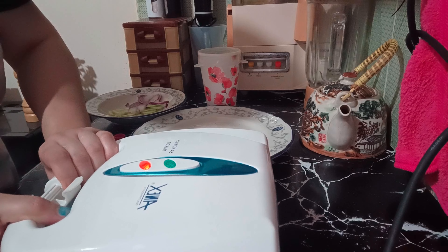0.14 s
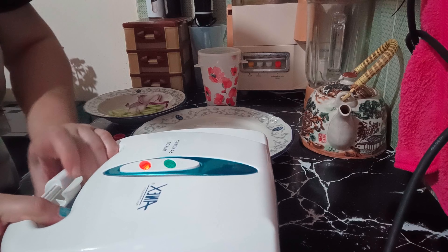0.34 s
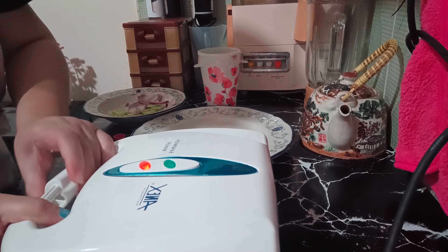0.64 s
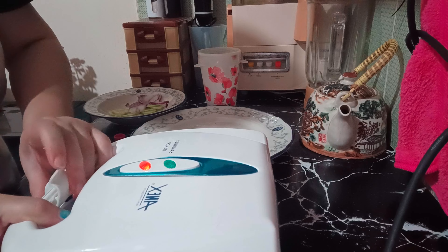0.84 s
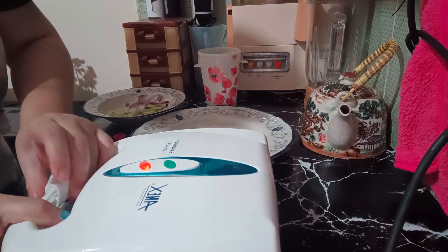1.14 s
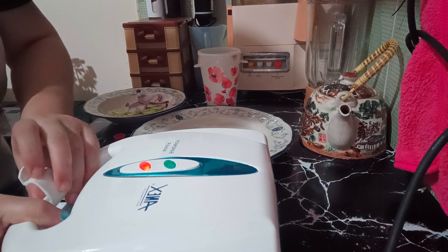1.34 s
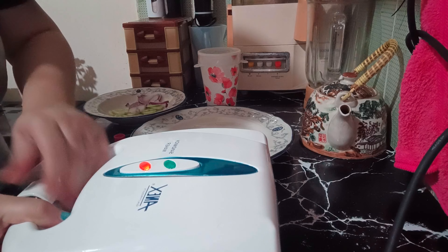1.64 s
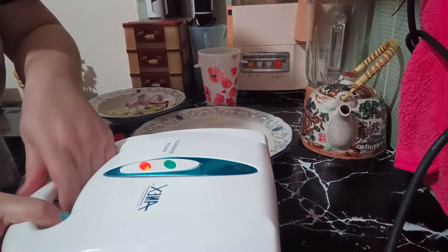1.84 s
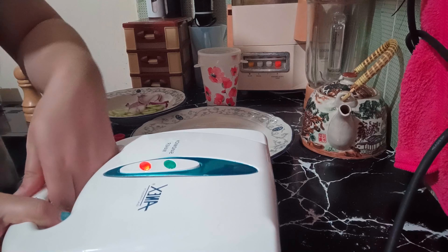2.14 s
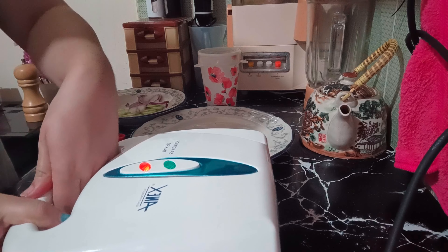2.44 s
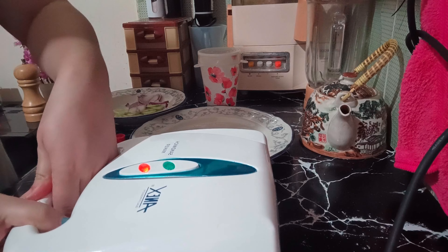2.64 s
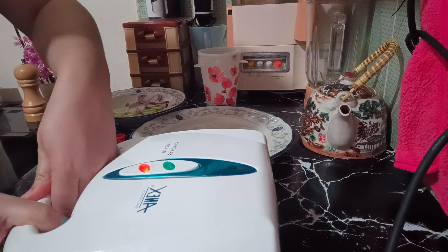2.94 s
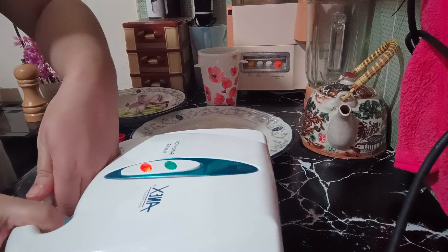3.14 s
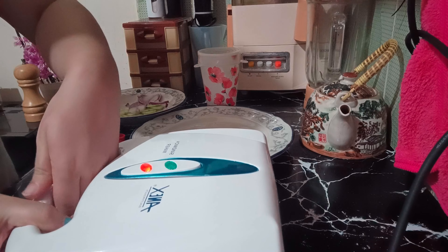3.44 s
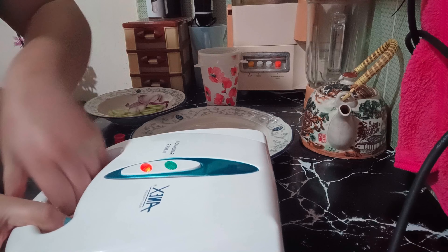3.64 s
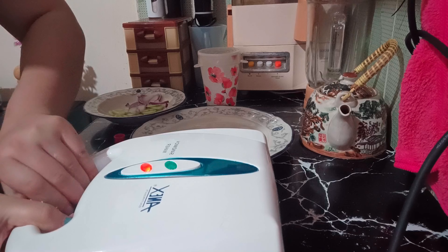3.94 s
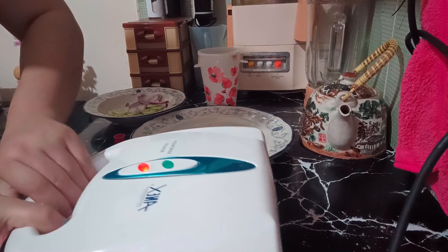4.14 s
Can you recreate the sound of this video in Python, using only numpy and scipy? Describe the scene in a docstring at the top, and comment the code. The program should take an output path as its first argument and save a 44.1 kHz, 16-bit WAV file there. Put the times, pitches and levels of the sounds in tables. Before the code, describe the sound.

In a small kitchen, close to the microphone, hands work the plastic lid and latch of a sandwich maker over a barely audible low hum and thin hiss. A quick run of knocks comes at about 0.3 s, strongest at 0.35, then faint touches and a dull knock at 1.05. Light clacks around 1.2-1.4 s include a short, soft scrape. At 1.82 s a very loud, hard plastic snap cracks out with a brief thin metallic ring and a short room tail. A second, lesser snap follows at 2.22, then small fumbling knocks and soft bumps around 2.45-2.65 and tiny ticks. Another crisp click-clack lands at 3.15. It is mostly quiet until a muted knock at 3.9 and a little flurry of clicks at 4.15-4.2. At about 4.26 s a heavy, deep thud of the body booms with a plastic clatter, just as the sound ends.

```python
"""Small kitchen, stone counter: hands work the plastic latch of a sandwich maker; the lid thuds at the end.
Most contacts are short gritty clatters, one is a slow scrape; all ring the modes of the plastic shell.
Hard clicks also wake thin metal plates; one-way pushes ring the low modes of the body.
Decaying noise gives the room's quarter-second tail; noise bands form a low appliance drone and faint hiss."""
import sys
import numpy as np
from scipy import signal
from scipy.io import wavfile

SR = 44100
rng = np.random.default_rng(int(sys.argv[2]) if len(sys.argv) > 2 else 0)


def magnitude_from_level(level_db):
    """Linear magnitude for a level in decibels (20 dB per decade)."""
    exponent = np.asarray(level_db, float) / 20
    return 10 ** exponent


def dump_mix(stems):
    """Bounce the given channels to the path in sys.argv[1] as a 16-bit WAV at rate SR."""
    frames = np.atleast_2d(stems).T  # one column per channel
    limited = np.clip(frames, -1, 1)  # hard clip at full scale
    pcm = np.round(limited * 32767).astype(np.int16)
    wavfile.write(sys.argv[1], SR, pcm)


N = 188790

# low noise and drone together: (time [s], rms level [dB])
DRONE_CURVE = [(0, -62), (.3, -68), (1.8, -68), (3.2, -67), (3.45, -72), (3.6, -70.5), (4.05, -69.5),
               (4.28, -61.5)]
# drone tones against the broad low noise at -68 dB: (centre [Hz], width [Hz], rms level [dB])
DRONE_TONES = [(122, 70, -74.5), (199.5, 4.1, -70), (347, 20, -77.5)]
# relative noise density, low and high parts levelled later: (frequency [Hz], density [dB])
NOISE_SPECTRUM = [(18, -49), (30, -19), (199, -2), (245, -8.5), (328, -6), (526, -11), (600, -10),
                  (760, -17), (962, -18.5), (1130, -19), (2290, -27.5), (3670, -28.5), (5740, -37.5),
                  (12000, -38), (16000, -31)]
# left-right correlation of the noise: (frequency [Hz], correlation [-1..1])
NOISE_LIKENESS = [(30, 0.027), (70, 0.75), (160, 0.67), (300, 0.24), (700, 0), (3000, 0), (15000, 1)]
HISS_RMS_DB = -75.5

# room decay at its start: (frequency [Hz], time to fall 60 dB at that rate [s])
ROOM_DECAY = [(300, .3), (800, 0.32), (2100, 0.35), (5500, 0.39), (14600, 0.22)]
# room tail: (frequency [Hz], gain of the noise [dB])
ROOM_GAIN = [(150, -37.5), (550, -33.5), (1100, -37.5), (2000, -41), (4000, -42), (8000, -33.5),
             (11000, -34.5), (14000, -34.5)]

# weight shifts of the body on the counter: (time [s], push area [dB], four times the rise scale [ms])
BODY_PUSHES = [(1.658, -48, 3), (1.675, -43.5, 4), (1.835, -44.5, 4), (2.575, -41.5, 3.2),
               (2.605, -41.5, 4), (2.64, -54.5, 1.3), (4.2575, -14, 1.5), (4.267, -11, 2), (4.2725, -16, 2)]
# whole body rocking on its feet: (frequency [Hz], gain [dB], t60 [s])
BODY_MODES = [(135, -9, 0.05), (162, -7, 0.066), (209, -0.5, .15), (398, 2, 0.14), (510, 0.5, 0.092)]

# metal plates inside: (frequency [Hz], mean ring height against the click in that range [dB], t60 [s])
PLATE_MODES = [(2620, -31, .3), (3550, -25, .22), (4550, -26, .27), (5670, -29, .27), (7535, -19, .27)]
SNAP_DB = -35   # only louder clicks wake the plates

# edges of the contact bands hollow, knock, click, tick, air: (frequency [Hz])
CONTACT_EDGES_HZ = [430, 900, 2500, 6000, 9500, 16000]
# plastic shell: (frequency [Hz], mean strength before the lean [dB], t60 [s])
SHELL_MODES = [(546.6, -3.5, 0.21), (585, -1.5, 0.14), (648, -4.5, 0.098), (797, -10, .03),
               (958.6, -11, 0.048), (1108, -3, 0.044), (1181, 3, 0.022), (1340, -2.5, 0.028),
               (1562, -1.5, 0.028), (1640, -9, 0.0067), (1819.5, -1, .02), (1975, 3.5, .02),
               (2074, -3.5, 0.0064), (2950, 6.5, .01), (3430, 9.5, 0.0052), (3790, 2, .01),
               (4115, 3.5, 0.012), (4250, -1, .01), (4700, 1, .01), (5360, -6.5, 0.03), (6200, 11.5, .01),
               (8230, 0, 0.009), (8090, -2.5, 0.013), (9044, -5.5, 0.0024), (10660, -3, 0.0032),
               (12170, -6, .006)]
# per band: (bare crack against ringing modes [dB])
BAND_CRACK_DB = [-12, -10, -5, -2, 5]
# per band, low modes build up more slowly: (share of the clatter length [ratio])
BAND_STRETCH = [1.6, 1.5, .95, 0.55, .8]
# per band: (upper edge of the sound over the band's edge [ratio])
BAND_TOP_RATIO = [.82, 0.87, 0.92, 0.93, 0.91]
# latch clicks, faint ticks and one slow scrape (at 1.345 s), 10 ms energy:
# (time [s], click [dB], knock re click [dB], tick re click [dB], length [ms])
LATCH_EVENTS = [(0.958, -55.5, 0, -12.5, 13), (1.224, -44, 11, -4.5, 5.8), (1.345, -63, 13.5, 8, 95),
                (1.646, -66.5, 4, -2.7, 19.5), (1.753, -62.5, 0.5, -4, 3), (1.792, -56, 6.5, -2.5, 9.6),
                (1.8224, -14, -12, -9, 2), (1.826, -18.5, -2, 0, 5.9), (2.2238, -25.5, -5, -11.5, 3.5),
                (2.409, -71.5, -12.5, 1, 2.4), (2.575, -64, 5, -4.5, 1.83), (2.689, -69, -1, -16, 2.4),
                (2.77, -72.5, -18, -1.5, 0.92), (2.909, -75.5, -18.5, 1, 1.5), (2.93, -81, -8.5, 3, 5.1),
                (3.1512, -24, -6, -13.5, 4.3), (4.107, -66.5, -3, -2.5, 6.4), (4.145, -70, 8, 5, 2.4),
                (4.1538, -42, -0.5, -1.5, 5.8), (4.1756, -50, -11, -6, 0.71),
                (4.18, -39, -13.5, -4.5, 0.42), (4.2009, -50, -7, -19, 1.1)]
# lid and handle, 10 ms energy: (time [s], knock [dB], hollow re knock [dB], click re knock [dB], length [ms])
LID_KNOCKS = [(0.2494, -61.5, 1, -2, 4.9), (0.304, -47, -9, -7, 7.3), (.33, -35.5, -23, -11.5, 7.6),
              (.348, -30.5, -5, -12, 1.6), (0.62, -71, -2, -3.5, 4.1), (0.748, -65, -8, -12.5, 7.4),
              (1.029, -61, 2, -14, 21), (1.049, -38, -8.5, -16, 4), (1.076, -72, 9, -3, 19),
              (1.273, -47, 1, -38, 5.1), (1.38, -40, 0, -12, 7.1), (1.479, -63.5, -3, -22, 2.1),
              (1.806, -31.5, -3, -12, 10.2), (2.091, -52.5, -19, -34.5, 2.6),
              (2.456, -55, -10.5, -11.5, 3.2), (2.529, -54.5, 3.1, -14, 13.3),
              (2.562, -60.5, 4.5, -11.5, 6.6), (2.614, -51.5, -5, -25, 3.9), (2.627, -60, -5, -19.5, 2.8),
              (2.864, -71.5, 0, -3.5, 1.21), (2.8871, -80, 20.5, -5.5, 3), (2.953, -80, 31, -5.5, 4.2),
              (3.05, -46.5, -1.5, -15.5, 5.7), (3.081, -53, -1.5, -18, 4.5), (3.156, -29.5, -8, 2.5, 2.27),
              (3.691, -72.5, -8, -10.5, 4.3), (3.8946, -49, -18, -25.5, 4.1), (4.236, -46, -14.5, -6, 4.3),
              (4.249, -50, 28, -25, 11), (4.259, -39, 13.5, 8, 4.7), (4.2635, -28.5, -3.9, 4.5, 3.9)]
# where the hand works: (time [s], left minus right [dB])
HAND_PAN = [(.35, 2.6), (1.39, 0.3), (1.82, 0), (2.22, -0.6), (3.15, 1.06), (3.9, -0.6), (4.16, 3),
            (4.26, -2.1)]
LATCH_HOLLOW_DB, KNOCK_TICK_DB = -15.5, -10   # hollow re knock of a latch event; tick re click of a lid knock
MODE_SPREAD_DB = 2.5   # standard deviation
LEFT_LAG_MS = 0.15


def rms_one(x):
    """Scale to unit rms."""
    return x / np.sqrt(np.mean(x ** 2) + 1e-20)


def energy_one(pieces):
    """Scale each piece to the energy of 10 ms at rms 1, mean of its channels."""
    energy = np.mean(np.sum(pieces ** 2, axis=2), axis=1) / (SR / 100)
    return pieces / np.sqrt(energy + 1e-30)[:, None, None]


def in_time(rows):
    """Second column of a curve, one value a sample."""
    s, values = np.transpose(rows)
    return np.interp(np.arange(N) / SR, s, values)


def at_hz(points, hz):
    """Read a spectrum on a log-frequency axis."""
    points_hz, values = np.transpose(points)
    return np.interp(np.log(hz), np.log(points_hz), values)


def band(x, low_hz, high_hz):
    """Band-pass."""
    return signal.sosfilt(signal.butter(2, [low_hz, high_hz], "band", fs=SR, output="sos"), x + 1e-18)


def high_pass(x, order, hz):
    """Butterworth bass cut."""
    return signal.sosfilt(signal.butter(order, hz, "high", fs=SR, output="sos"), x)


def ring(x, hz, t60_s):
    """Two-pole resonator: a unit click sets a decaying sine of starting height 1 ringing."""
    r, w = magnitude_from_level(-60 / (t60_s * SR)), 2 * np.pi * hz / SR
    return signal.lfilter([0, np.sin(w)], [1, -2 * r * np.cos(w), r * r], x + 1e-18)


def swell(rise_ms):
    """Force that rises to 1 and dies away; long ones swell in softly."""
    t = np.arange(4000) / SR / (max(rise_ms, .2) / 1000)
    return (t * np.exp(1 - t)) ** (1 + rise_ms / 15)


def add(out, s, piece):
    """Lay a piece into a track at time s."""
    i = round(s * SR)
    out[..., i:i + piece.shape[-1]] += piece[..., :N - i]


def shaped_noise(from_hz, to_hz):
    """Stereo noise in half-octave bands; mid and side mixed for the wanted correlation."""
    edges_hz = 28 * 2 ** np.arange(0, 9.6, .5)
    white = rng.standard_normal((2, 2, N))   # neighbouring bands take different noise
    total = 0
    for k, (low_hz, high_hz) in enumerate(zip(edges_hz, edges_hz[1:])):
        hz = np.sqrt(low_hz * high_hz)
        if from_hz <= hz < to_hz:
            mid, side = band(white[k % 2], low_hz, min(high_hz, .45 * SR))
            alike = np.clip(at_hz(NOISE_LIKENESS, hz), -1, 1)
            pair = np.sqrt(1 + alike) * mid + np.sqrt(1 - alike) * side * [[1], [-1]]
            total = total + magnitude_from_level(at_hz(NOISE_SPECTRUM, hz)) * pair
    return total


def hiss():
    """Steady noise above 700 Hz."""
    return magnitude_from_level(HISS_RMS_DB) * rms_one(shaped_noise(700, SR))


def drone():
    """Low noise plus narrow noise bands that waver as tones, under a level curve."""
    low = magnitude_from_level(-68.0) * rms_one(shaped_noise(0, 700))
    for hz, width_hz, db in DRONE_TONES:
        tone = band(rng.standard_normal(N), hz - width_hz / 2, hz + width_hz / 2)
        low = low + magnitude_from_level(db) * rms_one(tone)
    return magnitude_from_level(in_time(DRONE_CURVE)) * rms_one(low)


def kitchen(x):
    """Room tail: noise dying band by band, its end cut faster as by a noise suppressor, its own in each ear."""
    t = np.arange(SR // 2) / SR
    edges_hz = 120 * 2 ** np.arange(0, 7.2, .5)
    tail = 0
    for low_hz, high_hz in zip(edges_hz, edges_hz[1:]):
        hz = np.sqrt(low_hz * high_hz)
        decay = magnitude_from_level(-60 * t / at_hz(ROOM_DECAY, hz) - 170 * t ** 2)
        onset = 1 - np.exp(-t / 0.0013)
        noise = band(rng.standard_normal((2, len(t))), low_hz, high_hz)
        tail = tail + magnitude_from_level(at_hz(ROOM_GAIN, hz)) * noise * decay * onset
    return signal.fftconvolve(x, tail, axes=1)[:, :N]


def thuds():
    """Soft one-way pushes ring the low body modes; both ears hear them alike."""
    pushes = np.zeros(N)
    for k, (s, db, ms) in enumerate(BODY_PUSHES):
        push = swell(ms / 4)
        add(pushes, s, push / push.sum() * magnitude_from_level(db) * (-1) ** k)
    rung = sum(magnitude_from_level(db) * ring(pushes, hz, t60_s) for hz, db, t60_s in BODY_MODES)
    return high_pass(rung, 6, 100)


def plates():
    """Hard snaps wake clusters of close modes that beat roughly, met by each ear at another phase."""
    out = np.zeros((2, N))
    for hz, ring_db, t60_s in PLATE_MODES:
        impulses = np.zeros((2, N))
        for s, click_db, _, tick_db, _ in LATCH_EVENTS:
            if click_db > SNAP_DB:
                range_db = click_db + tick_db * (hz > CONTACT_EDGES_HZ[3])   # tick range above this edge
                height_db = range_db + ring_db + MODE_SPREAD_DB * rng.standard_normal()
                impulses[[0, 1], round(s * SR) + rng.integers(0, 20, 2)] = magnitude_from_level(height_db)
        for ratio in (.984, .993, 1, 1.005, 1.013):
            out += ring(impulses, hz * ratio, t60_s)
    return out


def contact_rows():
    """Latch events and knocks as (time [s], knock [dB], hollow [dB], click [dB], tick [dB], length [ms])."""
    latch = [(s, db + knock, db + knock + LATCH_HOLLOW_DB, db, db + tick, ms)
             for s, db, knock, tick, ms in LATCH_EVENTS]
    knocks = [(s, db, db + hollow, db + click, db + click + KNOCK_TICK_DB, ms)
              for s, db, hollow, click, ms in LID_KNOCKS]
    return np.array(latch + knocks)


def contacts():
    """Each gritty force drives all shell modes, new strengths per mode and ear, plus a bare crack."""
    rows = contact_rows()
    time_s, knock_db, hollow_db, click_db, tick_db, length_ms = rows.T
    air_db = tick_db - 3.5 + .8 * np.clip(tick_db - click_db, -16, 0)   # brighter click, more air
    levels_db = np.column_stack([hollow_db, knock_db, click_db, tick_db, air_db])
    sharpness_db = np.clip(click_db - knock_db, -16, 6)[:, None]
    spiky_gain = magnitude_from_level(2.8 * rng.exponential(1, (len(rows), 4000)))
    grit = rng.standard_normal((len(rows), 4000)) * spiky_gain
    spread = rng.standard_normal((len(rows), len(SHELL_MODES), 3))   # strength, left ear, right ear
    forces = np.zeros((len(rows), 6000))   # leaves room for the ring
    pieces = 0
    for k, (low_hz, high_hz) in enumerate(zip(CONTACT_EDGES_HZ, CONTACT_EDGES_HZ[1:])):
        forces[:, :4000] = [g * swell(BAND_STRETCH[k] * ms / 2) for g, ms in zip(grit, length_ms)]
        shell = 0
        for m, (hz, db, t60_s) in enumerate(SHELL_MODES):
            if low_hz < hz <= high_hz:
                apart = np.clip(hz / 1200, 0, 1)   # the ears see high modes from different sides
                # in the knock band, soft knocks favour the lower modes
                lean_db = (k == 1) * .6 * sharpness_db * np.log2(hz / 1350)
                strength = magnitude_from_level(db + lean_db + MODE_SPREAD_DB * spread[:, m, :1])
                ears = np.cos(apart * spread[:, m, 1:]) * strength
                rung = ring(forces, hz, t60_s)
                rung = rung / np.abs(rung).max(axis=1, keepdims=True)
                shell = shell + ears[:, :, None] * rung[:, None]
        crack = band(forces, low_hz, high_hz)[:, None]
        sound = energy_one(shell) + magnitude_from_level(BAND_CRACK_DB[k]) * energy_one(crack)
        sound = band(sound, low_hz / 1.05, high_hz * BAND_TOP_RATIO[k])
        pieces = pieces + energy_one(sound) * magnitude_from_level(levels_db[:, k])[:, None, None]
    out = np.zeros((2, N))
    for s, piece in zip(time_s, pieces):
        add(out, s, piece)
    out = high_pass(out, 6, 440)   # a small shell sends out no bass
    pan_db = in_time(HAND_PAN)
    return out * magnitude_from_level([pan_db / 2, -pan_db / 2])


def scene():
    """Contacts reach the left ear late; thuds and plates join, then room, drone and hiss."""
    direct = contacts()
    n = np.arange(N)
    direct[0] = np.interp(n - LEFT_LAG_MS * SR / 1000, n, direct[0])
    direct = direct + thuds() + plates()
    return direct + kitchen(direct) + drone() + hiss()


def band_limit(x):
    """A steep low-pass at the top of the band."""
    return signal.sosfilt(signal.butter(12, 16420, fs=SR, output="sos"), x)


def record(dry):
    """Top cut, peaks clipped at full scale, deep bass cut."""
    cut = signal.sosfilt(signal.cheby2(16, 55, 16500, fs=SR, output="sos"), dry)
    mix = high_pass(np.clip(cut, -1, 1), 2, 60)
    return band_limit(mix)


dry = scene()
out = record(dry)
dump_mix(out)
```